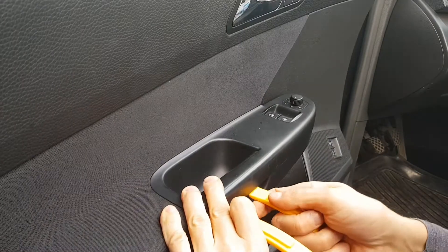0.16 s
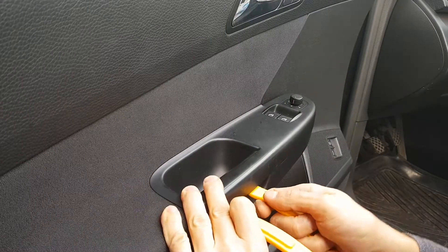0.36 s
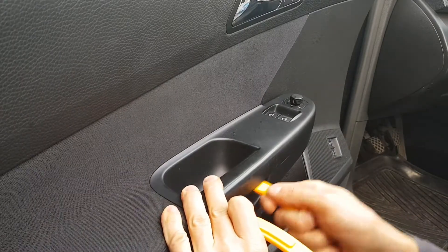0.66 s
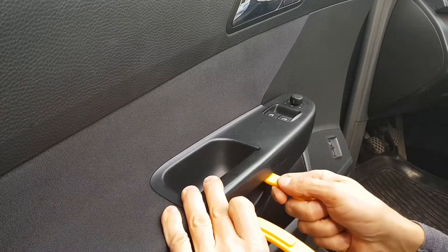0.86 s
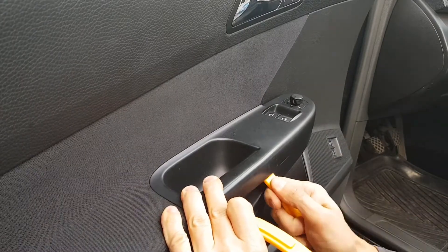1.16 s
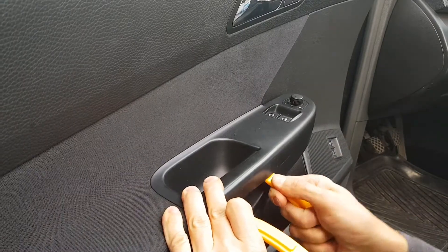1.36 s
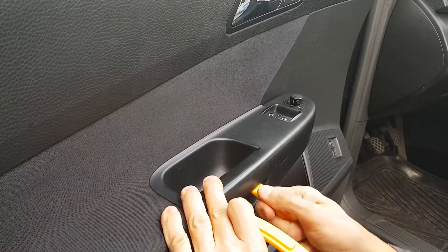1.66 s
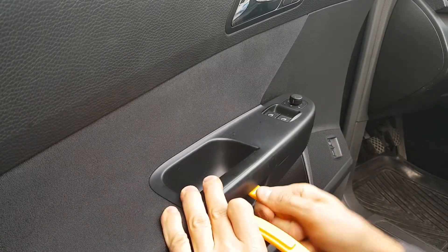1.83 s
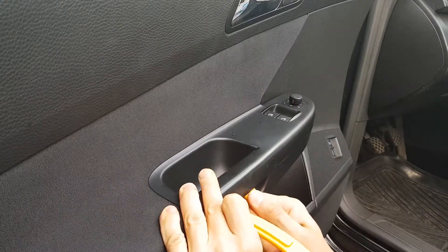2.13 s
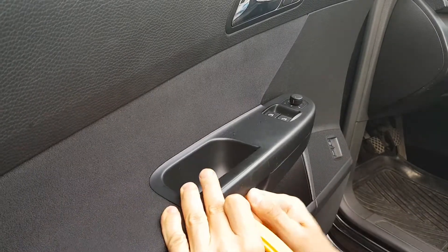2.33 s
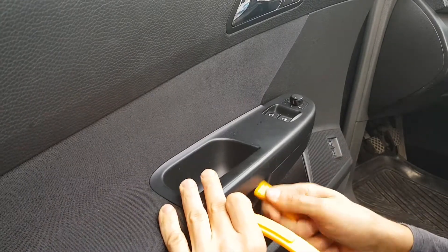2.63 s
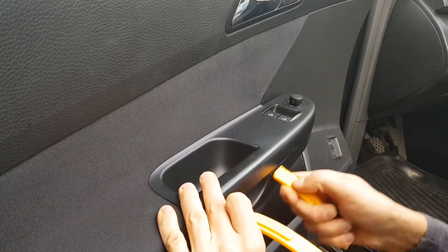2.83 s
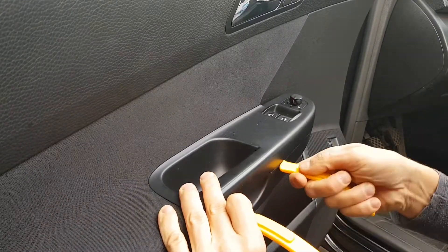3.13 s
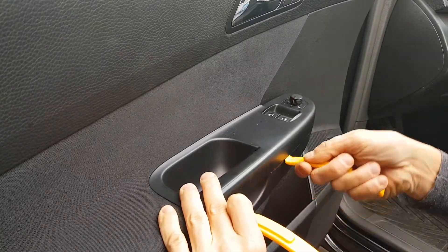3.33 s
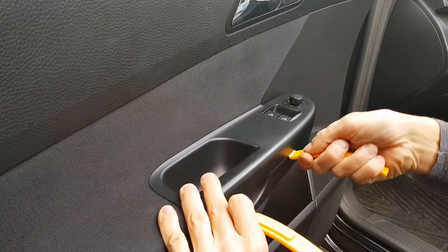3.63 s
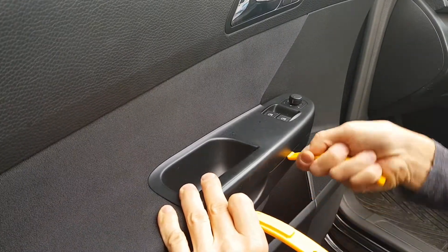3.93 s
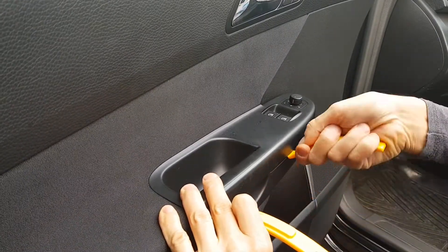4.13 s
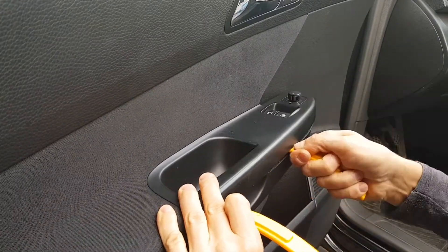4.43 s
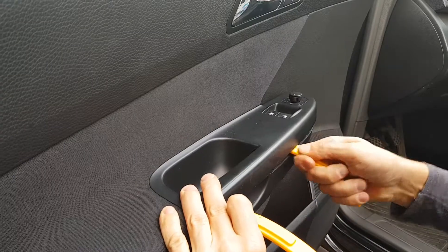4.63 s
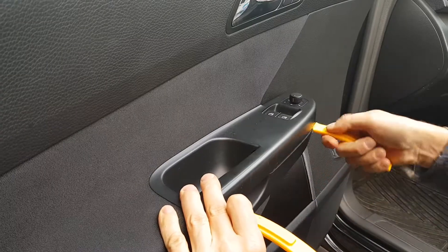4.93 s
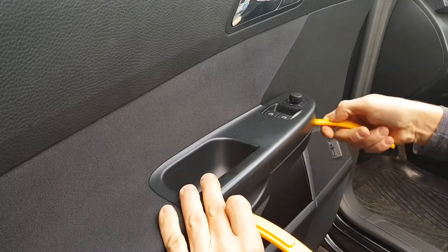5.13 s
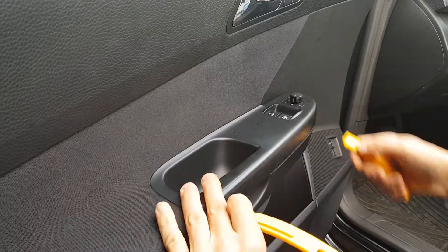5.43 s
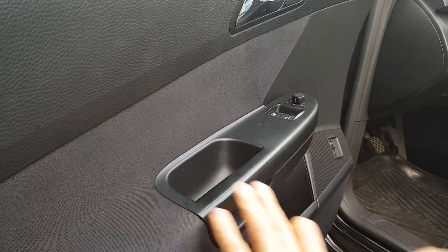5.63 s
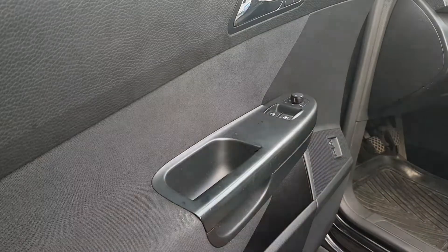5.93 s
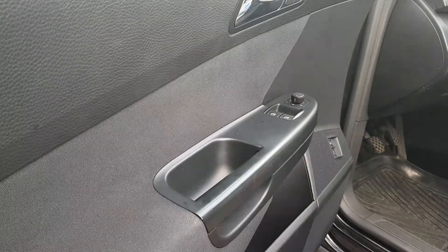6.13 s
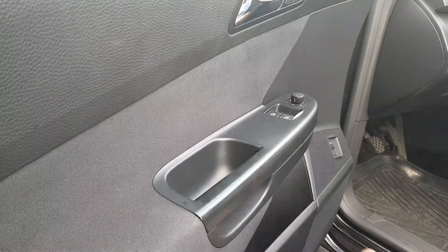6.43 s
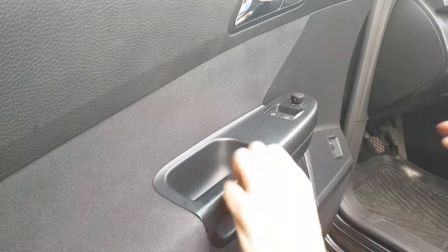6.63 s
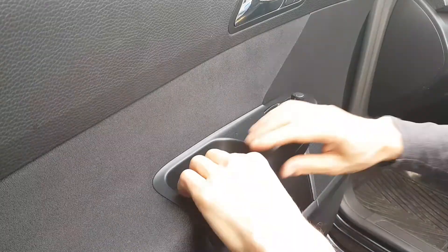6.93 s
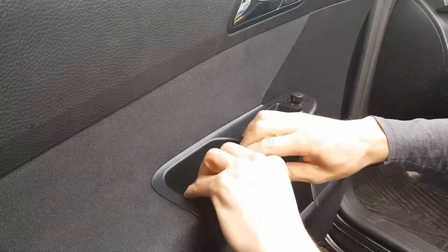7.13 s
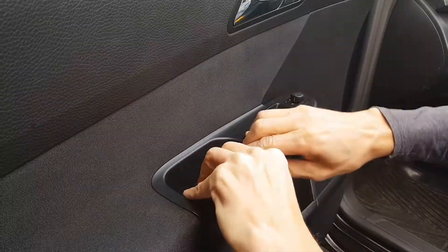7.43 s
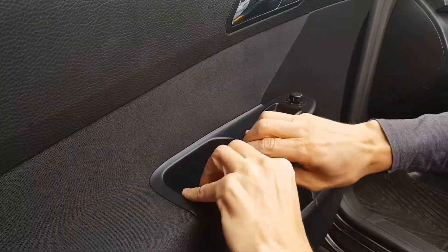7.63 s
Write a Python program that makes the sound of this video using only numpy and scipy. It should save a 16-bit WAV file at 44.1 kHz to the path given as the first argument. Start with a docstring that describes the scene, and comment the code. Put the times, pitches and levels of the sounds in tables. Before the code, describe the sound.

A plastic wedge clicks and scrapes at hollow car door trim, two loud clips snap free, then fingers softly grip it over fading road noise.

```python
"""At the open door of a car, a plastic wedge pries at the trim; two clips snap free, fingers then grip it.
Knocks and wedge ticks are clicks and chatter that ring groups of damped modes; scrapes are dense stick-slip
grains through the same modes. Struck patches ring hollow and settling wedges squeak, on single modes.
Outside, road noise made of filtered noise bands dies away under a drone and hisses; the cabin adds dense
reflections. The right microphone port hears more than the left."""
import sys
import numpy as np
from scipy import signal
from scipy.fft import rfft, irfft
from scipy.io import wavfile
from scipy.ndimage import uniform_filter1d

SR = 44100
rng = np.random.default_rng(int(sys.argv[2]) if len(sys.argv) > 2 else 0)


def nominal_scale(level):
    """Amplitude ratio for a level in decibels (scalar or array-like)."""
    x = np.asarray(level, float) / 20
    return 10 ** x


def wav_record(signal):
    """Record a signal, one row per channel, as 16-bit PCM in the file named by sys.argv[1]."""
    frames = np.transpose(np.atleast_2d(signal))
    bounded = np.clip(frames, -1, 1)
    # unit amplitude maps onto the largest positive 16-bit level
    quanta = np.round(bounded * 32767).astype(np.int16)
    wavfile.write(sys.argv[1], SR, quanta)


N = 343098   # samples in the scene
SPAN = 12288   # samples in one short sound

# Road noise outside. Each row: time in seconds, tyre noise in dB, broad hiss in dB.
OUTSIDE = [(0.0, -55.5, -69.5), (0.65, -54, -67.5), (0.9, -55.5, -71), (2.34, -55.5, -76.5),
           (3.0, -59.5, -85), (4.3, -62.5, -86), (6.2, -70, -87), (6.98, -66.5, -75), (7.78, -68, -76)]
# Noise spectra outside. Each row: frequency in Hz, relative level in dB per Hz.
RUMBLE = [(15, -45.5), (25, -18), (37, -3.5), (70, 4), (87, -4), (118, -3), (221, -17), (348, -34),
          (400, -33), (520, -54), (880, -120)]
TYRES = [(120, -34), (200, -7.5), (236, -5), (354, -13.5), (732, -11.5), (819, -13), (936, -7), (1200, -13),
         (2000, -15), (2500, -27), (2990, -37.5), (5060, -120)]
TYRES_HIGH = [(1290, -29), (2200, -0.5), (4520, -14), (5650, -17), (6820, -19.5), (9000, -25),
              (11700, -47.5), (19800, -120)]
HISS = [(2940, -41), (5000, -0.5), (6630, -13.5), (9290, -14), (10400, -3.5), (12400, -11), (15100, -1),
        (16100, -4), (16400, -14)]
# The microphone's own steady hiss. Each row: frequency in Hz, relative level in dB per Hz.
MIC_HISS = [(6500, -24), (8500, -9.5), (10500, -5.5), (13000, 3), (16000, 0)]
# Likeness of far noise at the ports. Each row: frequency in Hz, left-right correlation from -1 to 1.
FAR_LIKENESS = [(60, 0.89), (180, 1), (550, -0.63), (1650, -0.52), (4970, 0.86), (15000, 0.13)]
# Balance of far noise and of near sounds. Each row: frequency in Hz, left minus right in dB.
FAR_BALANCE = [(60, -14.5), (130, -12.5), (290, -15), (640, -13), (1410, -9), (3100, -10), (6820, -9),
               (15000, -1.5)]
NEAR_BALANCE = [(60, -12.5), (180, -10.5), (550, -9), (1650, -6.5), (4970, -8.5), (15000, -13.5)]
# Engine drone near 72 Hz. Each row: time in seconds, level in dB.
DRONE = [(0, -42), (.5, -44.5), (.6, -48.5), (3.3, -61), (7.78, -60.5)]
# Thin hiss at 13 kHz. Each row: time in seconds, level in dB.
THIN_HIGH = [(0, -69), (.5, -66.5), (1, -76.5), (1.45, -78), (1.6, -100)]
# Spells of thin hiss at 9 kHz. Each row: start in seconds, end in seconds, level in dB.
THIN_LOW = [(0, 1.077, -78.5), (2.307, 2.44, -75), (3.503, 4.05, -86)]
# Cabin reflections. Each row: band centre in Hz, relative level in dB per Hz, 60 dB decay time in seconds.
CABIN = [(150, -9, .13), (380, 0, 0.14), (1010, -0.5, .15), (2500, -2.5, 0.17), (6100, -1, .17),
         (13000, -6.5, 0.23)]
# Squeaks of a settling wedge. Each row: peak in seconds, half length in seconds, pitch in Hz, level in dB.
SQUEAKS = [(6.02, .012, 2800, -70.5), (6.039, 0.0087, 2800, -66), (6.061, .009, 2750, -63),
           (6.08, 0.008, 2800, -73.5), (6.295, 0.017, 2780, -71.5)]
# Patches of the plastic ring at their own pitches under some knocks. Each row: start in seconds,
# pitch in Hz, level in dB.
HOLLOW_RINGS = [(.555, 967, -32), (2.192, 537, -24.5), (2.199, 806, -24), (2.2, 1200, -27),
                (2.201, 379, -18), (2.508, 300, -49), (4.323, 790, -22.5), (4.324, 257, -22.5),
                (4.331, 568, -21), (4.338, 93.6, -28), (4.088, 600, -33), (4.091, 2020, -33),
                (.755, 2400, -44), (.722, 850, -30), (.722, 2700, -40), (.565, 3100, -40),
                (.702, 3000, -42), (4.33, 820, -22), (4.346, 700, -30), (2.212, 620, -26),
                (7.603, 900, -48), (4.96, 2820, -58.5), (4.701, 820, -30), (4.959, 540, -40.5),
                (4.96, 1800, -51.5), (5.024, 2800, -50), (5.031, 522, -39.5), (5.365, 484, -46),
                (5.443, 496, -34.5), (5.442, 1200, -33.5), (6.599, 2750, -44.5), (7.011, 3600, -52),
                (7.061, 695, -36.5), (7.061, 1210, -36), (7.429, 270, -40)]
# Spectrum of the dense damped modes of plastic. Each row: frequency in Hz, relative level in dB per Hz.
PLASTIC = [(41, -37), (70, 0), (268, 1), (815, -12), (1250, -11), (1510, -10), (2600, -14), (3260, -17),
           (3570, -22.5), (5300, -28.5), (7060, -33.5), (8860, -19.5), (11600, -24.5), (16000, -41.5)]
# Single modes of trim and wedge. Each row: frequency in Hz, width in Hz, level in dB over PLASTIC.
TRIM = [(90.13, 50, -6), (152.7, 40, -6), (256.5, 54, 0), (400, 90, 3), (575, 42, 2.5), (773, 27, 4),
        (964, 110, -0.5), (1150, 240, -5), (1640, 98, -2.5), (1960, 180, 2.5), (2540, 140, -4.5),
        (3312, 150, -10.5)]
WEDGE = [(235.9, 140, 0), (850, 260, 0.0025), (1110, 210, 0.0036), (2750, 61, 0), (5400, 110, 0)]
# Borders in Hz between the four mode groups: thud, knock, click and top.
GROUP_EDGES_HZ = [600, 1600, 7200]
# Scrapes and faint rubs on the plastic, by the wedge and later by the fingers. Each row: peak in seconds,
# swell in seconds, decay in seconds, knock level in dB, click level in dB, hiss level in dB.
SCRAPES = [(0.578, 0.095, 0.078, -50, -39, -46.5), (0.703, .003, 0.04, -49, -40, -58),
           (2.184, 0.055, .005, -63, -80, -81.5), (4.083, 0.043, .005, -49.5, -78, -84),
           (4.092, .004, 0.043, -39, -45, -53.5), (4.7, 0.04, 0.053, -36, -44.5, -51),
           (5.03, 0.045, 0.034, -48.5, -58, -68), (5.432, 0.084, .005, -50.5, -65, -70),
           (5.51, 0.079, 0.036, -59, -62.5, -69), (5.882, .004, 0.076, -66.5, -56, -64),
           (5.97, 0.097, 0.22, -72, -69, -81.5), (6.06, .02, 0.093, -72.5, -68, -80),
           (6.287, .004, 0.062, -72.5, -60.5, -70), (6.383, .003, 0.055, -61, -52.5, -60),
           (6.408, 0.014, 0.041, -64, -40, -47.5), (6.456, .04, 0.065, -64, -55.5, -65.5),
           (7.018, 0.0052, 0.062, -46.5, -52.5, -58.5), (7.339, 0.022, .05, -58, -71, -83.5),
           (7.46, .05, .16, -54, -66, -80), (7.55, .05, .08, -58, -70, -84),
           (7.61, 0.038, 0.023, -51.5, -70.5, -84)]
# The wedge itself ticks, later it is laid down. Each row: start in seconds, click level in dB,
# ring pitch in Hz, thud level in dB, crack level in dB.
WEDGE_TICKS = [(0.105, -51, 1900, -74, -68), (0.2196, -30.5, 2080, -67, -49.5),
               (0.2402, -48, 1920, -65, -62), (1.77, -31, 1950, -53, -71), (2.683, -40, 2520, -44.5, -68),
               (5.88, -44.5, 3590, -65.5, -50), (6.056, -67, 4600, -76, -70.5),
               (6.2835, -62.5, 2770, -70.5, -59.5), (6.3813, -51, 2850, -45.5, -51),
               (6.3968, -42, 2300, -49.5, -41.5), (6.412, -45, 3300, -59, -52),
               (6.4993, -60, 3000, -64, -76)]
# Fingers press the trim, all equally soft. Each row: start in seconds, knock level in dB.
GRIPS = [(7.256, -58), (7.328, -58.5), (7.406, -57.5), (7.427, -46), (7.451, -52.5), (7.487, -53.5),
         (7.544, -55.5), (7.59, -52), (7.603, -53), (7.716, -53)]
# Knocks on the trim and clips letting go. Each row: start in seconds, thud level in dB,
# knock level in dB, contact time in ms, chatter length in ms.
PRIES = [(0.286, -48.5, -41.5, 0.088, 7), (0.546, -46, -39, 0.78, 4.1), (0.556, -44.5, -32, 0.76, 7.7),
         (0.564, -58, -27, 0.35, 5.5), (0.581, -52, -38, 0.56, 4.6), (0.701, -42, -31, 0.29, 5.3),
         (0.721, -32, -29, 0.24, 5.8), (0.726, -25.5, -31.5, 0.07, 4.1), (0.74, -34, -52, 0.19, 4.2),
         (0.778, -36, -54, .6, 4), (0.754, -30.5, -40, 0.3, 6.4), (1.597, -59, -45, 0.13, 8.5),
         (1.891, -43, -66, 0.45, 7), (2.109, -34, -50, 1.5, 6.1), (2.167, -38, -50, 1.3, 4.9),
         (2.186, -44, -29, 0.6, 8.1), (2.1916, -18, -16.5, 0.14, 3.7), (2.199, -19, -14, 0.39, 4.8),
         (2.2022, -21, -20, .4, 3.2), (2.21, -26.5, -33, 0.058, 3.7), (2.214, -27, -36, .45, 3),
         (2.447, -47, -61, 0.25, 6.5), (2.523, -41, -56.5, 0.24, 13), (2.57, -37.5, -40.5, 1.8, 6.2),
         (2.946, -45, -50.5, 0.26, 8.6), (3.169, -51, -76.5, 0.24, 5.8), (3.281, -46.5, -62, 0.56, 3.2),
         (4.088, -40, -31.5, 0.3, 5.2), (4.322, -26, -14.5, 0.68, 8), (4.329, -20.5, -23.5, 0.064, 7.1),
         (4.337, -22, -17, 0.33, 2.9), (4.341, -28, -27, 0.32, 3.2), (4.35, -38, -42, 0.06, 5.5),
         (4.354, -39, -29.5, .4, 3.3), (4.672, -39, -46, 0.4, 7), (4.689, -37.5, -46, 0.43, 2.5),
         (4.701, -25, -36, 0.15, 4.3), (4.721, -34, -57, 0.32, 3.4), (4.958, -45.5, -56.5, 0.84, 16.5),
         (5.022, -40, -53, 1, 7.2), (5.08, -51, -61, 0.62, 5), (5.359, -36, -50, 0.43, 6.3),
         (5.39, -44.5, -44, 0.19, 3.7), (5.442, -36.5, -38, 0.12, 3.2), (5.493, -53, -58, 0.2, 7.6),
         (5.519, -50, -67, 0.097, 19.4), (6.42, -53.5, -67, .8, 5.5), (6.5938, -45.5, -48, 0.06, 5),
         (6.599, -44.5, -48, 0.2, 13.6), (6.677, -42, -50, 0.25, 9.7), (7.011, -45.5, -39.5, 0.15, 5.7),
         (7.06, -34, -37, 0.18, 7.5)]

RUMBLE_DB, RUMBLE_FOLLOWS = -50, 0.3   # mean level; share of the hiss's swing
BRIGHT_DB = -81.5   # mean level of the tyres' treble
BRIGHT_FOLLOWS_TYRES, BRIGHT_FOLLOWS_HISS = 1.3, 0.83   # shares of their swings
DRONE_HZ, DRONE_WIDTH_HZ = 72, 12
THIN_FADE_DB_PER_S = 150
MIC_HISS_DB = -80.5
CABIN_DB = -12   # reflections relative to the direct sound
SQUEAK_WIDTH_HZ = 166
HOLLOW_LOSS, HOLLOW_CHATTER_MS = 0.1, 3.2   # loss: width over pitch
STROKE_RANGE_DB, STROKE_THUD_DB = 31, 0.5   # rise and fall of a stroke; thud over knock
RING_LOSS, RING_DB = 0.14, 21   # the wedge's free end: width over pitch, height
TICK_CHATTER_MS, TICK_KNOCK_DB = 2.9, -2   # knock over thud
GRIP_THUD_DB, GRIP_CONTACT_MS, GRIP_CHATTER_MS = 4, 1.3, 8.4   # thud over knock
CLICK_HZ, TOP_HZ = 2800, 10400   # the upper mode groups
HARD_CLICK_DB, HARD_TOP_DB = 3.5, 10   # their level over the knock at the hardest contact
NOTCH_HZ, NOTCH_WIDTH_HZ, NOTCH_DEPTH = 7600, 2000, 0.4   # the microphone ports cancel here
CUTOFF_HZ = 15900


def rms_one(x):
    """Normalization: scales a signal to unit rms."""
    return x / np.sqrt(np.mean(x ** 2) + 1e-20)


def at_hz(points, hz):
    """Interpolation of a curve along logarithmic frequency."""
    curve = np.array(points)
    return np.interp(np.log(hz), np.log(curve[:, 0]), curve[:, 1])


def in_time(rows):
    """Linear interpolation of each column over the samples of the scene."""
    s, *columns = np.transpose(rows)
    return np.array([np.interp(np.arange(N) / SR, s, c) for c in columns])


def sides(balance_db):
    """Level difference between the ports: left and right gains whose mean is 1."""
    left = np.atleast_1d(nominal_scale(balance_db))
    return np.array([left, np.ones_like(left)]) * 2 / (1 + left)


def drift(rate_hz):
    """Low-passed random fluctuation of unit rms, drawn at every 40th sample."""
    pole = np.exp(-2 * np.pi * rate_hz * 40 / SR)
    white = rng.standard_normal(N // 40 + 2002)
    slow = signal.lfilter([1], [1, -2 * pole, pole ** 2], white)[2000:]   # settled part only
    return np.interp(np.arange(N) / 40, np.arange(len(slow)), rms_one(slow))


def band(x, low_hz, high_hz):
    """Band-pass filtering with maximally flat response."""
    edges = [low_hz, min(high_hz, .45 * SR)]
    return signal.sosfilt(signal.butter(2, edges, "band", fs=SR, output="sos"), x)


def far_noise(spectrum, patchy_db):
    """Partial coherence: 0.4-octave noise bands, each with level, flicker, likeness, balance; mid rms 1."""
    out, white = 0, rng.standard_normal((2, 2, N))
    lowest, highest = spectrum[0][0], spectrum[-1][0]
    edges = lowest * 2 ** np.arange(0, np.log2(highest / lowest) + .3, .4)
    for k, (low, high) in enumerate(zip(edges, edges[1:])):
        mid, side = band(white[k % 2], low, high)   # neighbouring bands get unrelated noise
        hz = np.sqrt(low * high)
        alike = np.clip(at_hz(FAR_LIKENESS, hz), -1, 1)
        pair = np.sqrt(1 + alike) * mid + np.sqrt(1 - alike) * side * [[1], [-1]]
        gain = nominal_scale(at_hz(spectrum, hz) + patchy_db * drift(3.8))
        out = out + gain * sides(at_hz(FAR_BALANCE, hz)) * pair
    return out / np.sqrt(np.mean(out.mean(axis=0) ** 2))


def narrow(hz, width_hz, level_db, balance_db):
    """Narrow-band noise, whose level wavers by 1 dB rms."""
    noise = band(rng.standard_normal(N), hz - width_hz / 2, hz + width_hz / 2)
    return nominal_scale(level_db + 1.0 * drift(3.8)) * rms_one(noise) * sides(balance_db)


def outside():
    """Superposition of rumble, drone, tyre noise that fades and dulls with distance, and steady or thin hisses."""
    tyres_db, hiss_db = in_time(OUTSIDE)
    hiss_swing = hiss_db - hiss_db.mean()
    tyres_swing = tyres_db - tyres_db.mean()
    bright_db = BRIGHT_DB + BRIGHT_FOLLOWS_TYRES * tyres_swing + BRIGHT_FOLLOWS_HISS * hiss_swing

    rumble = nominal_scale(RUMBLE_DB + RUMBLE_FOLLOWS * hiss_swing) * far_noise(RUMBLE, patchy_db=1.5)
    drone = narrow(DRONE_HZ, DRONE_WIDTH_HZ, in_time(DRONE)[0], balance_db=-10.5)
    tyres = nominal_scale(tyres_db) * far_noise(TYRES, patchy_db=2.5)
    tyres += nominal_scale(bright_db) * far_noise(TYRES_HIGH, patchy_db=1.0)

    t = np.arange(N) / SR
    spells = []
    for start, end, db in THIN_LOW:
        seconds_away = np.maximum(0, np.maximum(start - t, t - end))
        spells.append(db - THIN_FADE_DB_PER_S * seconds_away)
    thin = narrow(13150, 800, in_time(THIN_HIGH)[0], balance_db=-28.5)
    thin += narrow(9050, 550, np.max(spells, axis=0), balance_db=-22.0)

    hiss = nominal_scale(hiss_db) * far_noise(HISS, patchy_db=0.5)
    mic_hiss = nominal_scale(MIC_HISS_DB) * far_noise(MIC_HISS, patchy_db=0.9)
    return rumble + drone + tyres + thin + hiss + mic_hiss


def cabin(x):
    """Reverberation: dense reflections from seats and door frame, each band dying at its own rate."""
    t = np.arange(2 * SPAN) / SR
    noise = rng.standard_normal((2, 2, 2 * SPAN))   # neighbouring bands get unrelated noise
    low = signal.sosfilt(signal.butter(1, 700, fs=SR, output="sos"), noise)
    noise += low[:, :1] - low   # long waves are the same at both ports
    echoes = 0
    for k, (hz, db, t60) in enumerate(CABIN):
        echoes = echoes + band(noise[k % 2], hz / 1.7, hz * 1.7) * nominal_scale(db - 60 * t / t60)
    echoes *= t > .002   # no reflection before 2 ms
    echoes /= np.sqrt(np.sum(echoes ** 2, axis=1, keepdims=True))
    return signal.fftconvolve(x, echoes, axes=1)[:, :N]


def resonance(hz, width_hz):
    """Frequency response of a damped resonator, with gain 1 at its peak."""
    f = np.arange(SPAN // 2 + 1) * SR / SPAN
    return 1j * f * width_hz / (hz ** 2 - f ** 2 + 1j * f * width_hz)


def slips(per_s, spread_db):
    """Stick-slip friction: random clicks of very uneven size; rms 1."""
    sizes = nominal_scale(spread_db * np.minimum(rng.exponential(1, SPAN), 4)) * rng.choice([-1, 1], SPAN)
    return rms_one(sizes * (rng.random(SPAN) < per_s / SR))


def blow(responses, levels_db, chatter_ms, first_db):
    """Impact excitation: a first click and a dying chatter of slips ring the body."""
    force = slips(7000., 3.5) * np.exp(-np.arange(SPAN) / SR / (max(chatter_ms, .5) / 1000))
    force[0] = nominal_scale(first_db)
    rung = irfft(rfft(force) * np.array(responses), SPAN)
    # each level is the rms of the strongest 300 samples
    strongest = uniform_filter1d(np.mean(rung ** 2, axis=1), size=300).max(axis=1)
    gains = nominal_scale(levels_db) / np.sqrt(strongest)
    return np.sum(rung * gains[:, None, None], axis=0)


def add(out, at_s, sound):
    """Superposition of a short sound on the mix, its end faded."""
    i = int(at_s * SR)
    fade = np.clip(np.linspace(8, 0, SPAN) - 1, 0, 1)
    out[:, i:i + SPAN] += (sound * fade)[:, :N - i]


def radiation(modes, dense_db, loss, scatter_db):
    """Modal superposition: returns a function drawing stereo responses by group for a new contact point."""
    f = np.arange(SPAN // 2 + 1) * SR / SPAN
    dense = np.geomspace(75, 16300, 90) * np.exp(rng.normal(0, .015, 90))
    mode_hz, mode_width, mode_db = np.transpose(modes)
    hz = np.r_[mode_hz, dense]
    width = np.r_[mode_width, loss * dense]
    level_db = at_hz(PLASTIC, hz) + np.r_[mode_db, np.full(len(dense), dense_db)]

    shapes = resonance(hz[:, None], width[:, None])
    # low neighbours in opposite phase, the rest in step
    rank = np.argsort(np.argsort(hz))
    shapes *= np.where(hz < GROUP_EDGES_HZ[0], (-1) ** rank, 1)[:, None]
    shapes = shapes * (1j * f / (55 + 1j * f)) ** 2   # the door radiates nothing under its lowest mode
    group = np.searchsorted(GROUP_EDGES_HZ, hz)
    ports = sides(at_hz(NEAR_BALANCE, np.maximum(f, 1)))
    # each group but the top is low-passed above its upper border
    softer = [1 / (1 + 1j * f / (2.0 * top)) ** 2 for top in GROUP_EDGES_HZ] + [1]
    apart_db = 5.5 * hz / (hz + 1500)   # short waves reach the two ports differently

    def draw():
        """Mode strengths scatter with the point of contact."""
        scattered_db = level_db + rng.normal(0, scatter_db, len(hz))
        strength = nominal_scale(scattered_db + apart_db * rng.standard_normal((2, len(hz))))
        delay_s = [[rng.uniform(0, .0003)], [0]]   # the left port is a little farther away
        late = np.exp(-2j * np.pi * f * delay_s)
        return [late * ports * softer[g] * (strength[:, group == g] @ shapes[group == g]) for g in range(4)]
    return draw


def squeaks():
    """Friction-driven oscillation: fine slips keep one narrow mode singing for a moment."""
    out, t = np.zeros((2, N)), np.arange(SPAN) / SR
    for s, half, hz, db in SQUEAKS:
        mode = resonance(hz, SQUEAK_WIDTH_HZ) ** 2
        tone = rms_one(irfft(rfft(slips(8100.0, 2.5)) * mode, SPAN))
        swell = np.sin(np.pi * np.clip(t / (2 * half), 0, 1))
        add(out, s - half, nominal_scale(db) * tone * swell * sides(at_hz(NEAR_BALANCE, hz)))
    return out


def hollow_rings():
    """Local resonance: a patch of the plastic rings at its own pitch, as one damped mode."""
    out = np.zeros((2, N))
    for s, hz, db in HOLLOW_RINGS:
        mode = resonance(hz, HOLLOW_LOSS * hz) * resonance(hz, hz)
        response = mode * sides(at_hz(NEAR_BALANCE, hz))
        add(out, s, blow([response], [db], HOLLOW_CHATTER_MS, first_db=10.5))
    return out


def scrapes(draw):
    """Sliding friction: dense slips drive the lower modes, finer slips hiss in the treble."""
    out = np.zeros((2, N))
    for s, swell, decay, knock, click, hiss in SCRAPES:
        swell = np.clip(swell, .002, .1)
        coarse, fine = slips(4500.0, 4.5), slips(14000.0, 2.5)
        t = np.arange(SPAN) / SR - swell   # zero at the peak
        stroke = nominal_scale(-STROKE_RANGE_DB * np.maximum(-t / swell, t / max(decay, .002)))
        levels_db = [knock + STROKE_THUD_DB, knock, click, hiss]
        for response, db, force in zip(draw(), levels_db, [coarse, coarse, coarse, fine]):
            gain = nominal_scale(db) / np.sqrt(np.mean(abs(response.mean(axis=0)) ** 2))
            add(out, s - swell, irfft(rfft(force * stroke * gain) * response, SPAN))
    return out


def wedge_ticks(draw):
    """Cantilever resonance: the free length of the wedge sets the pitch at which each tick rings."""
    out = np.zeros((2, N))
    for s, click, ring_hz, thud, crack in WEDGE_TICKS:
        responses = draw()
        responses[2] = responses[2] * (1 + nominal_scale(RING_DB) * resonance(ring_hz, RING_LOSS * ring_hz))
        levels_db = [thud, thud + TICK_KNOCK_DB, click, crack]
        add(out, s, blow(responses, levels_db, TICK_CHATTER_MS, first_db=21.5))
    return out


def pries(draw):
    """Contact-time law: wedge, fingers and clips knock the trim; a longer contact carries less treble."""
    out = np.zeros((2, N))
    grips = [(s, db + GRIP_THUD_DB, db, GRIP_CONTACT_MS, GRIP_CHATTER_MS) for s, db in GRIPS]
    for s, thud, knock, contact_ms, chatter_ms in PRIES + grips:
        periods = np.array([CLICK_HZ, TOP_HZ]) * contact_ms / 1000   # in one contact
        click, top = knock - 20 * np.log10(1 + periods ** 2)
        levels_db = [thud, knock, click + HARD_CLICK_DB, top + HARD_TOP_DB]
        add(out, s, blow(draw(), levels_db, chatter_ms, first_db=5.5))
    return out


def scene():
    """Superposition of the near sounds, their cabin reflections and the noise outside."""
    trim = radiation(TRIM, dense_db=-3.0, loss=.14, scatter_db=1.0)
    wedge = radiation(WEDGE, dense_db=4.5, loss=0.098, scatter_db=4.0)
    near = squeaks() + hollow_rings() + scrapes(trim) + wedge_ticks(wedge) + pries(trim)
    return outside() + nominal_scale(CABIN_DB) * cabin(near) + near


def band_limit(x):
    """A steep low-pass at the top of the band."""
    return signal.sosfilt(signal.butter(12, 16510, fs=SR, output="sos"), x)


def record(dry):
    """Interference and saturation: the ports cut a notch, the loudest peaks are rounded, the top is cut."""
    b, a = signal.iirpeak(NOTCH_HZ, NOTCH_HZ / NOTCH_WIDTH_HZ, fs=SR)
    notched = dry - NOTCH_DEPTH * signal.lfilter(b, a, dry)
    rounded = 1.639 * np.tanh(notched / 1.585)
    top_cut = signal.cheby2(12, 30, CUTOFF_HZ, fs=SR, output="sos")
    return band_limit(signal.sosfilt(top_cut, rounded))


dry = scene()
out = record(dry)
wav_record(out)
```